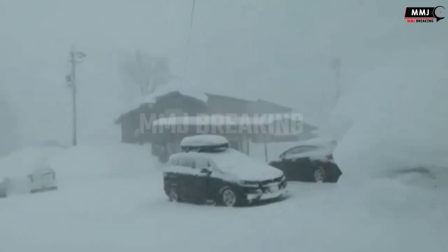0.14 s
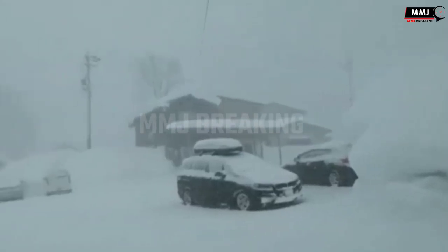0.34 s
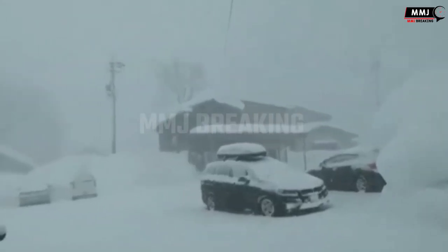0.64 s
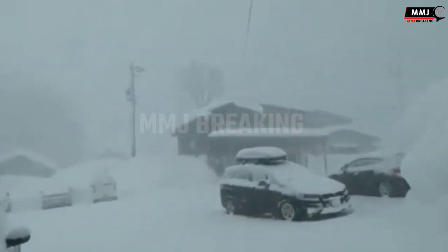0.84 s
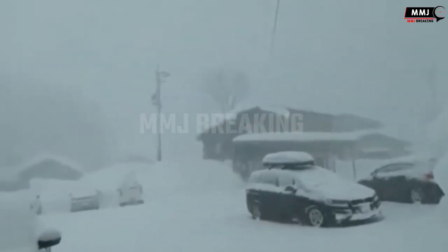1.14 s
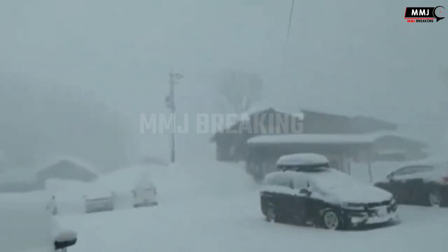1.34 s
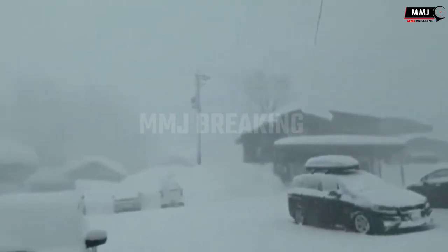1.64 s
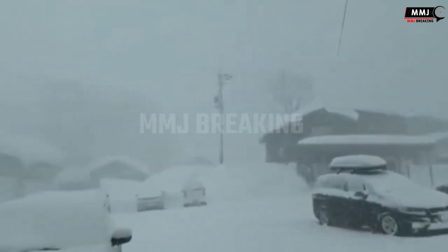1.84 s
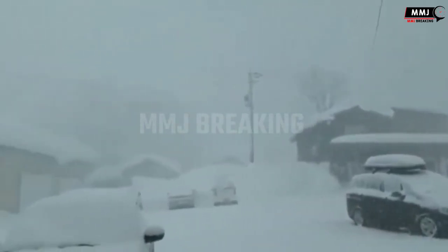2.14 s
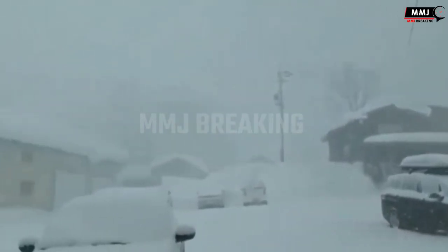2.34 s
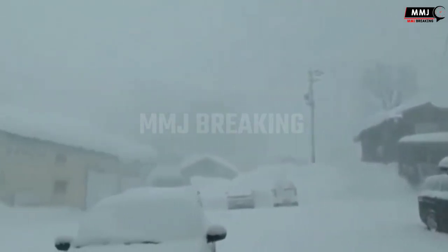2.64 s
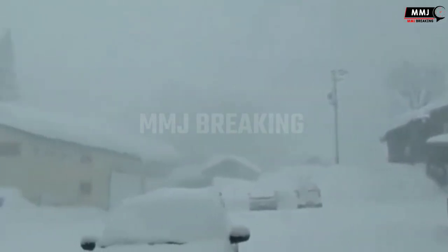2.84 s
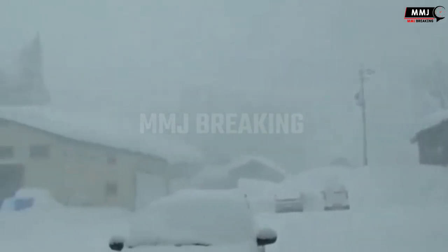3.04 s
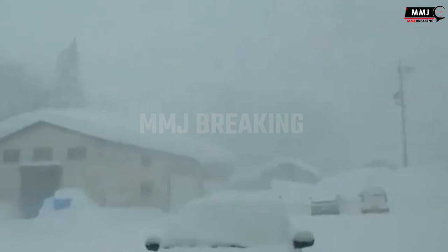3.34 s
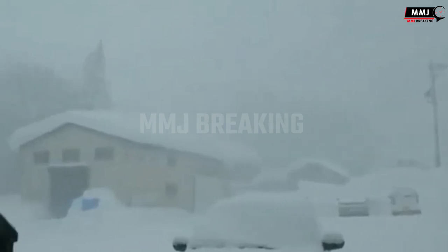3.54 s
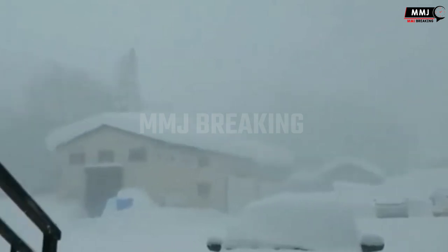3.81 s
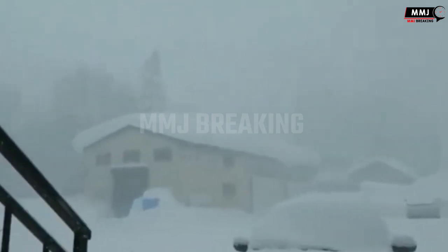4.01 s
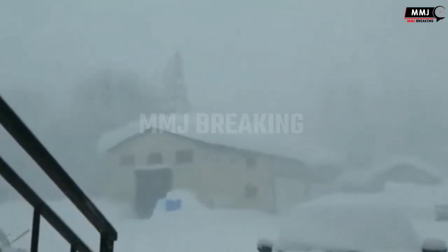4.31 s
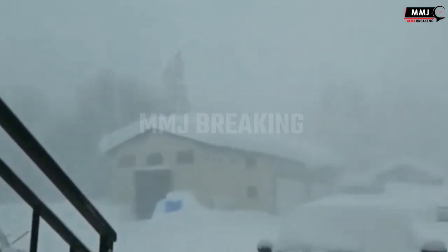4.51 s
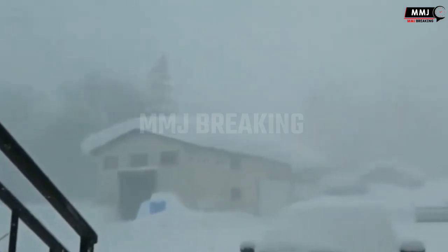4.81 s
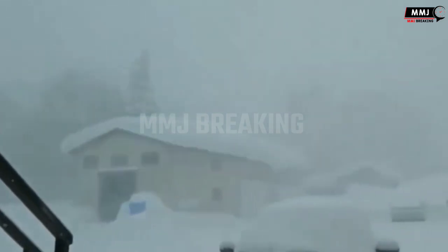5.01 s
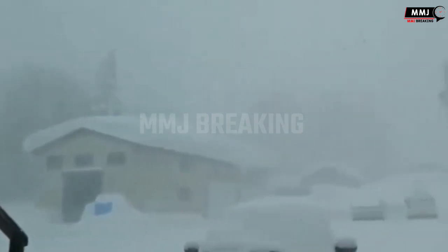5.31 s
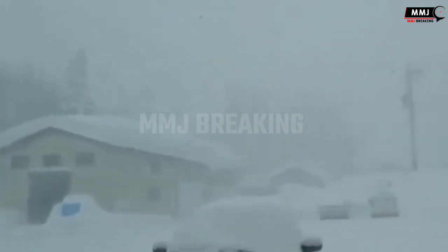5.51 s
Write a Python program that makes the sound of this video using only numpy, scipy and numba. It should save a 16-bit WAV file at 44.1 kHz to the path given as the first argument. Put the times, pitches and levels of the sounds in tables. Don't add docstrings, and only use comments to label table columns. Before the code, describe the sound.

Rough low wind buffeting with a wandering hollow moan, thin gusty snow hiss and a few tiny ticks, in coarse, low-quality phone sound.

```python
import sys
import numpy as np
from scipy import signal
from scipy.fft import rfft, irfft, next_fast_len
from scipy.io import wavfile
from scipy.ndimage import uniform_filter1d
from numba import njit

SR = 44100
rng = np.random.default_rng(int(sys.argv[2]) if len(sys.argv) > 2 else 0)


def digitize_waveform(pressure):
    field = np.atleast_2d(pressure).T
    bounded = np.clip(field, -1, 1)
    quanta = np.round(bounded * 32767).astype(np.int16)
    wavfile.write(sys.argv[1], SR, quanta)


def gain_from_db(level_db):
    decades = np.asarray(level_db, float) / 20
    return 10 ** decades


N = 249606

# time in seconds, level in dB.
WIND_PRESSURE = [(0.0, -64), (0.06, -54), (0.15, -51), (0.45, -45.5), (0.82, -39.0), (1.19, -39),
                 (1.57, -43.5), (1.94, -41), (2.31, -45.5), (2.68, -46.5), (3.06, -40), (3.43, -43.5),
                 (3.8, -40.1), (4.17, -37.5), (4.54, -43.0), (4.92, -42), (5.29, -39.5), (5.66, -46.1)]
# time in seconds, lift in dB (minus for a lull), centre in Hz, half length in seconds.
EDDIES = [(0.158, 8.5, 34.7, 0.061), (0.237, 10.5, 100.6, 0.025), (0.33, 7, 49.6, 0.035),
          (0.465, 12.5, 70, 0.019), (0.585, 8, 70, 0.017), (0.977, 9, 70, 0.035), (1.402, 8.5, 70, 0.034),
          (1.494, 8.0, 35, 0.036), (1.671, 7, 50, 0.023), (1.746, 9, 70, 0.025), (2.036, -2, 35, 0.037),
          (2.197, 7, 140, 0.044), (2.2, 13, 35, 0.035), (2.28, -14, 140, 0.025), (2.479, 7, 35.4, 0.029),
          (2.51, 9.5, 100, 0.025), (2.555, 6.4, 35, 0.061), (2.629, 7.5, 35, 0.025),
          (2.968, -9.5, 50.4, 0.031), (3.093, 6.2, 100, 0.021), (3.136, 4, 49.6, 0.054),
          (3.247, 3, 35, 0.046), (3.367, -14, 100, 0.03), (3.57, 9.8, 35, 0.019), (3.613, 9.4, 140, 0.052),
          (3.68, 6, 70, 0.032), (4.316, 10.5, 34, 0.054), (4.51, 8.5, 50.5, 0.025),
          (4.568, 5.5, 140, 0.018), (5.413, 6, 70, 0.06)]
# frequency in Hz, density in dB per Hz.
THUMP_COLOUR = [(12, -45.5), (24, -7), (42, -2.5), (50, 2), (62, -23)]
RUMBLE_COLOUR = [(40, -21.5), (52, 1.5), (66, 1.5), (84, -2.5), (110, -9), (140, -26)]
ROAR_COLOUR = [(70, -22), (120, 3.5), (200, -6), (370, -17.5), (600, -30)]

# time in seconds, level in dB, centre in Hz.
MOAN_COURSE = [(0.0, -50.5, 259), (0.1, -44.5, 254), (0.75, -43, 266.3), (1.3, -43.5, 247),
               (1.6, -41, 255.7), (2.6, -44.5, 253), (3.4, -42.5, 274.7), (4.1, -42.5, 260.7),
               (4.8, -40.5, 254), (5.3, -50, 245.5), (5.66, -38, 246.5)]
# time in seconds, lift in dB.
MOAN_SWELLS = [(0.409, 6), (0.474, 6), (0.659, -9.5), (0.748, 5.5), (0.888, 3), (1.013, 4.56), (1.098, 7.5),
               (1.257, 4.56), (1.367, 5.04), (1.796, 8), (2.31, 4.5), (2.41, 8), (2.534, 2), (2.659, 8),
               (2.794, 6), (2.878, 4), (3.208, 4.5), (3.293, 2), (3.553, 5.5), (3.776, 5), (3.851, 9),
               (4.26, 4.5), (4.585, -7), (4.644, 3), (4.704, -8), (5.118, -6), (5.243, 10), (5.293, 4.5),
               (5.348, 10), (5.597, -8.28)]

# time in seconds, level in dB.
SNOW_DENSITY = [(0.0, -73.5), (0.06, -67.5), (0.15, -61), (0.45, -61.5), (0.82, -58), (1.19, -57.0),
                (1.57, -60.0), (1.94, -59.5), (2.31, -61), (2.68, -61), (3.06, -58.5), (3.43, -60.5),
                (3.8, -60), (4.17, -57.5), (4.54, -61.5), (4.92, -62), (5.29, -58), (5.66, -62.5)]
# time in seconds, lift in dB (minus for a gap), half length in seconds.
SNOW_PUFFS = [(0.454, 2.5, 0.025), (0.673, -3.5, 0.012), (0.768, -4.5, 0.012), (1.073, 2.5, 0.025),
              (1.412, 2.0, 0.056), (1.527, 2.5, 0.025), (1.716, 8, 0.011), (1.766, 2.0, 0.025),
              (2.05, 2.5, 0.05), (2.17, 5, 0.0095), (2.509, 5.5, 0.023), (2.604, 5, 0.0088),
              (2.704, 3.5, 0.011), (3.103, 2, 0.012), (3.347, -3, 0.025), (3.542, 1, 0.012),
              (3.612, 4, 0.062), (3.707, 2, 0.021), (4.3, 4, 0.05), (4.405, 3, 0.0088), (4.495, 2.5, 0.035),
              (4.944, 2.5, 0.062), (5.433, 6.5, 0.014), (5.652, 2.5, 0.0071)]
# frequency in Hz, density in dB per Hz.
RUSH_COLOUR = [(190, -27.5), (330, -3.5), (371, -6), (470, -4), (636, -11), (794, -11), (1450, -16.5),
               (2100, -29.5)]
HISS_COLOUR = [(1200, -13.5), (1800, 0.5), (2600, -3.5), (3600, -5.5), (4800, -25)]
SIZZLE_COLOUR = [(3000, -16.5), (4000, 2), (4900, 1.5), (5830, -3.5), (7000, -12), (8500, -19.5),
                 (12000, -33)]

# time in seconds, peak in dB.
FLAKE_TICKS = [
    (0.6993, -69),
    (0.8274, -64.5),
    (1.2506, -73),
    (1.4376, -85),
    (1.65, -91),
    (2.8524, -86),
    (4.2842, -83.5),
    (4.376, -70),
]
# time in seconds, peak in dB, ring in Hz.
ICE_PINGS = [
    (1.0803, -78, 8650),
    (2.6259, -79.5, 9740),
    (3.5175, -70, 10300),
    (4.788, -65, 10070),
    (4.9457, -65.5, 10300),
]

# frequency in Hz, step in dB.
ROUNDING_STEP = [(100, -55), (1000, -50), (2000, -52), (3500, -53), (5000, -54), (7000, -57), (9000, -61),
                 (13000, -64)]


def rms_one(x):
    return x / np.sqrt(np.mean(x ** 2) + 1e-20)


def evened(x, span_s):
    return rms_one(x / np.sqrt(uniform_filter1d(x ** 2, round(span_s * SR)) + 0.058))


def in_time(rows):
    s, *columns = np.transpose(rows)
    return [np.interp(np.arange(N) / SR, s, c) for c in columns]


def drift(rate):
    hop = 40
    r = np.exp(-2 * hop * np.pi * rate / SR)
    chance = rng.standard_normal(N // hop + 2002)
    slow = signal.lfilter([1], [1, -2 * r, r * r], chance)[2000:]
    return np.interp(np.arange(N) / hop, np.arange(len(slow)), rms_one(slow))


def bump(s, half_s):
    t = np.arange(0, N + 64, 64) / SR
    return np.exp(-.5 * ((t - s) / max(half_s, .005)) ** 2)


def lifts(rows):
    coarse = sum(db * bump(s, half_s) for s, db, half_s in rows)
    return np.interp(np.arange(N) / 64, np.arange(len(coarse)), coarse)


def coloured(colour):
    size = next_fast_len(N, True)
    hz = np.maximum(np.arange(size // 2 + 1) * SR / size, 1)
    point_hz, point_db = np.transpose(colour)
    density_db = np.interp(np.log(hz), np.log(point_hz), point_db)
    return hz, rfft(rng.standard_normal(size)) * gain_from_db(density_db)


def patchy(colour, shared_db, own_db, shared_rate, own_rate):
    hz, noise = coloured(colour)
    lowest, highest = colour[0][0], colour[-1][0]
    place = 2 * np.log2(hz / lowest)
    together, out = drift(shared_rate), np.zeros(N)
    for k in range(int(2 * np.log2(highest / lowest)) + 2):
        share = np.cos(np.pi / 2 * np.clip(place - k, -1, 1)) ** 2
        band = irfft(noise * share, next_fast_len(N, True))[:N]
        out += gain_from_db(shared_db * together + own_db * drift(own_rate)) * band
    return rms_one(out)


def eddies_near(hz):
    spread_octaves = .6
    rows = []
    for s, db, centre, half_s in EDDIES:
        nearness = np.exp(-.5 * (np.log2(centre / hz) / spread_octaves) ** 2)
        rows.append((s, db * nearness, half_s))
    return lifts(rows)


def buffet():
    opening_db, opening_s = -21, 0.037
    wind_db = in_time(WIND_PRESSURE)[0] + opening_db * np.exp(-(np.arange(N) / SR / opening_s) ** 2)
    thump = patchy(THUMP_COLOUR, shared_db=2.5, own_db=5.0, shared_rate=8.9, own_rate=8.1)
    rumble = patchy(RUMBLE_COLOUR, shared_db=1.7, own_db=0.4, shared_rate=3.8, own_rate=11.0)
    roar = patchy(ROAR_COLOUR, shared_db=1.6, own_db=0.2, shared_rate=17.0, own_rate=6.2)
    out = gain_from_db(wind_db + 1 + eddies_near(hz=39.7)) * evened(thump, span_s=0.07)
    out += gain_from_db(wind_db + 7 + eddies_near(hz=70)) * evened(rumble, span_s=0.055)
    out += gain_from_db(wind_db - 1 + eddies_near(hz=140)) * evened(roar, span_s=0.075)
    return out


@njit
def wandering_resonance(x, hz, width_hz, rate):
    r, out = np.exp(-np.pi * width_hz / rate), np.zeros(len(x))
    for i in range(2, len(x)):
        out[i] = x[i] - x[i - 2] + 2 * r * np.cos(2 * np.pi * hz[i] / rate) * out[i - 1] - r * r * out[i - 2]
    return out


def hollow_tone(hz, width_hz):
    once = wandering_resonance(rng.standard_normal(N), hz, width_hz, SR)
    twice = wandering_resonance(once, hz, 1.85 * width_hz, SR)
    return evened(twice, span_s=0.07)


def moan():
    level_db, hz = in_time(MOAN_COURSE)
    waver_hz, overtone_ratio, overtone_db, swell_half_s = 2.5, 1.775, -13, .02
    hz = hz + waver_hz * drift(6.0)
    swell_db = lifts([(s, db, swell_half_s) for s, db in MOAN_SWELLS])
    fundamental = hollow_tone(hz, width_hz=34.4)
    overtone = hollow_tone(overtone_ratio * hz, width_hz=90)
    return gain_from_db(level_db + swell_db) * fundamental + gain_from_db(level_db + overtone_db) * overtone


def snow_hiss():
    snow_db, = in_time(SNOW_DENSITY)
    mean_db = np.mean(snow_db)
    flutter_db, flutter_per_s = 0.94, 19
    flutter = drift(flutter_per_s)
    flutter = flutter - uniform_filter1d(flutter, round(.15 * SR))
    puff_db = lifts(SNOW_PUFFS) + flutter_db * flutter

    rush = patchy(RUSH_COLOUR, shared_db=0.85, own_db=0.95, shared_rate=12.0, own_rate=13.0)
    hiss = patchy(HISS_COLOUR, shared_db=0.65, own_db=0.9, shared_rate=11.0, own_rate=15.0)
    sizzle = patchy(SIZZLE_COLOUR, shared_db=0.1, own_db=1.5, shared_rate=12.0, own_rate=21.0)

    upper = signal.sosfiltfilt(signal.butter(1, 860, "high", fs=SR, output="sos"), rush)
    rush = rush + (gain_from_db(.5 * puff_db) - 1) * upper

    rush_db = mean_db + 8.5 + .75 * (snow_db - mean_db) + .35 * puff_db
    hiss_db = snow_db - 2 + puff_db
    sizzle_db = snow_db - 8.5 + 1.1 * puff_db
    return gain_from_db(rush_db) * rush + gain_from_db(hiss_db) * hiss + gain_from_db(sizzle_db) * sizzle


def flakes():
    out, t = np.zeros(N), np.arange(900) / SR
    bright = signal.butter(3, [6500, 10000], "band", fs=SR, output="sos")
    for s, db in FLAKE_TICKS:
        burst = rng.standard_normal(900) * np.exp(-t / 0.0043)
        out[round(s * SR):][:900] += gain_from_db(db + 4.5) * signal.sosfilt(bright, burst)
    for s, db, hz in ICE_PINGS:
        ring = np.sin(2 * np.pi * hz * t) * np.exp(-t / 0.0042)
        out[round(s * SR):][:900] += gain_from_db(db + 1.5) * ring
    return out


def scene():
    return (buffet() + moan() + snow_hiss() + flakes())[None]


def thrifty_rounding(x):
    hop = 940
    n, k = np.arange(2 * hop), np.arange(hop)
    window = signal.windows.kaiser_bessel_derived(2 * hop, 3 * np.pi)
    basis = np.sqrt(2 / hop) * window * np.cos(np.pi / hop * np.outer(k + .5, n + .5 + hop / 2))
    frames = N // hop + 2
    padded = np.pad(x, (hop, (frames + 1) * hop - N - hop), mode="reflect").reshape(-1, hop)
    lines = np.hstack([padded[:-1], padded[1:]]) @ basis.T

    hz = (k + .5) * SR / 2 / hop
    band = (3 * np.sqrt(k)).astype(int)
    bands = band[-1] + 1
    point_hz, point_db = np.transpose(ROUNDING_STEP)
    usual_db = np.interp(np.log(hz), np.log(point_hz), point_db)
    masking_db = 10 * np.log10(np.mean(lines[:, 90:280] ** 2, axis=1) + 1e-9)
    step_db = usual_db + .85 * (masking_db - np.median(masking_db))[:, None]
    step_db += 2.3 * rng.standard_normal((frames, bands))[:, band]
    step_db += 1.7 * rng.standard_normal((frames, 1))
    step_db[[round(s * SR / hop) for s, db in FLAKE_TICKS]] -= 11
    step = gain_from_db(step_db)
    rounded = np.sign(lines) * np.floor(np.abs(lines) / step + .4) * step

    chance = rng.random((frames // 2 + 1, bands)).repeat(2, axis=0)
    starved = chance[:frames, band] < .045
    halves = (rounded * ~(starved & (hz > 1500))) @ basis
    return (halves[:-1, hop:] + halves[1:, :hop]).ravel()[:N]


def roll_off(x):
    return signal.sosfilt(signal.butter(12, 15700, fs=SR, output="sos"), x)


def record(dry):
    noise = signal.lfilter([1, .6], [1], rng.standard_normal(dry.shape))
    noise_db = -94 + 0.8 * drift(3.0)
    mix = thrifty_rounding(dry[0]) + gain_from_db(noise_db) * noise
    return roll_off(mix)


dry = scene()
out = record(dry)
digitize_waveform(out)
```